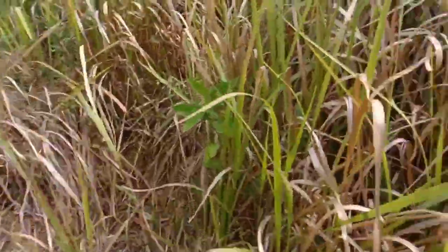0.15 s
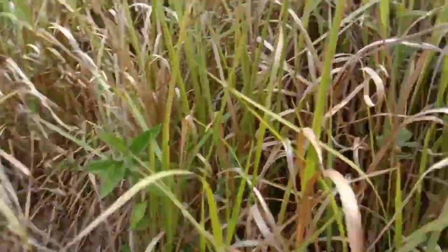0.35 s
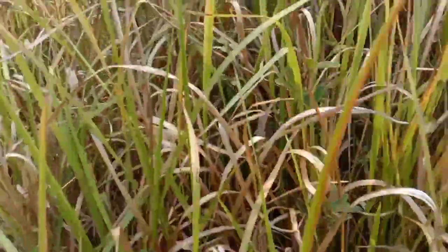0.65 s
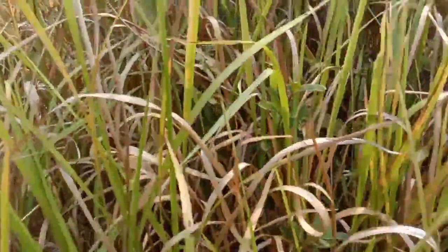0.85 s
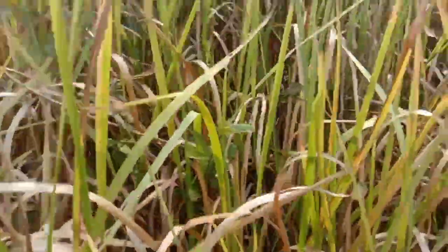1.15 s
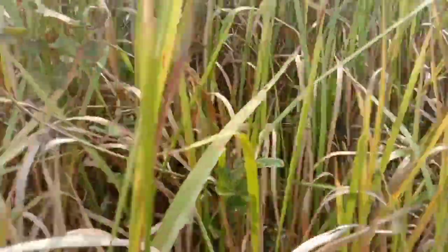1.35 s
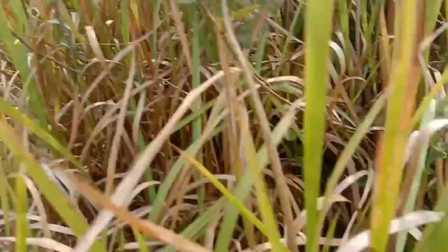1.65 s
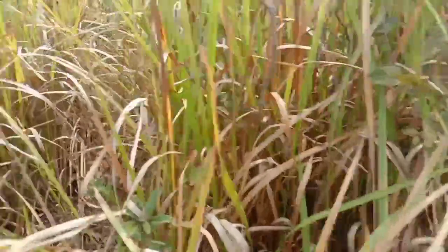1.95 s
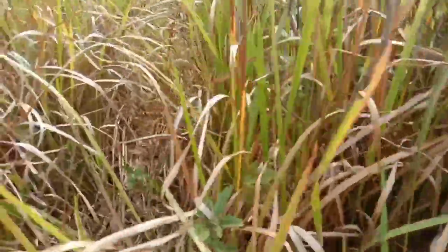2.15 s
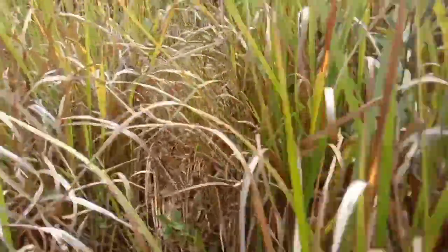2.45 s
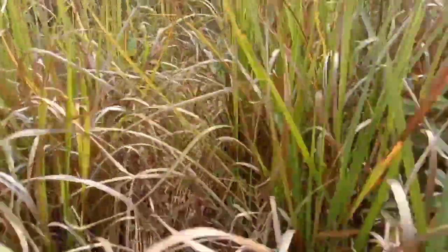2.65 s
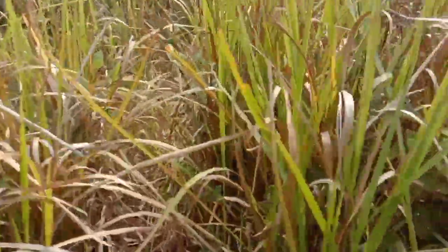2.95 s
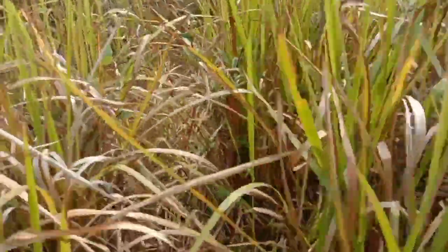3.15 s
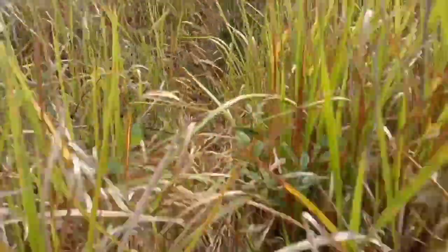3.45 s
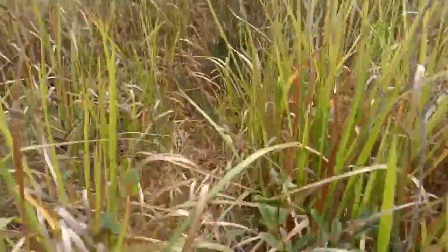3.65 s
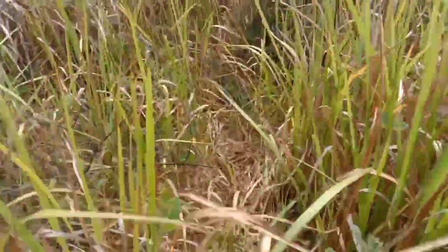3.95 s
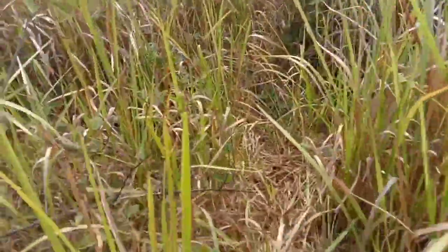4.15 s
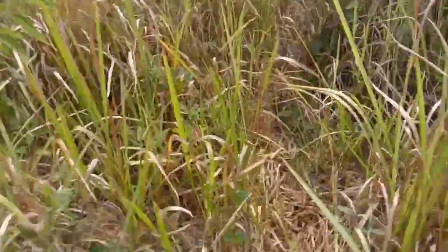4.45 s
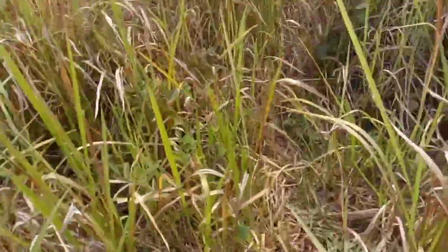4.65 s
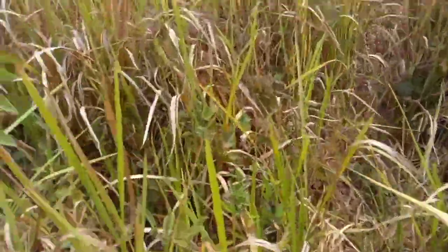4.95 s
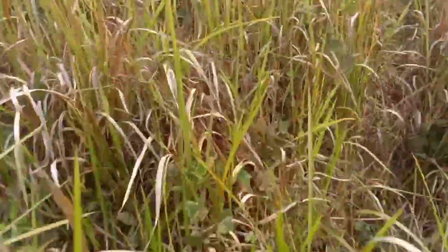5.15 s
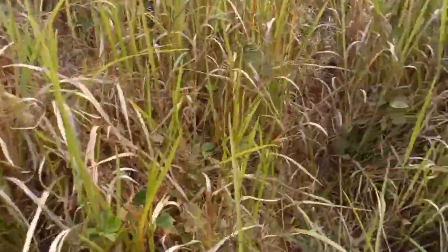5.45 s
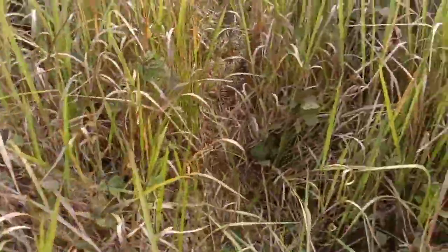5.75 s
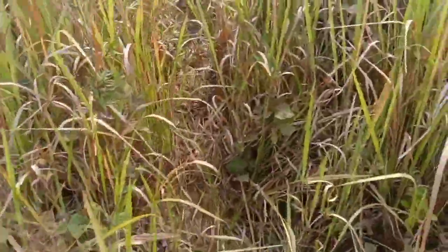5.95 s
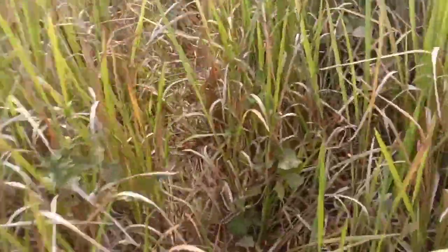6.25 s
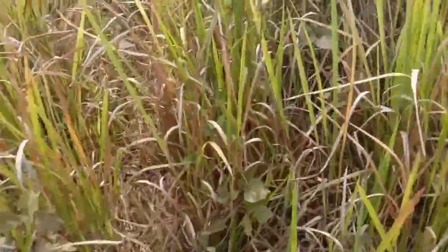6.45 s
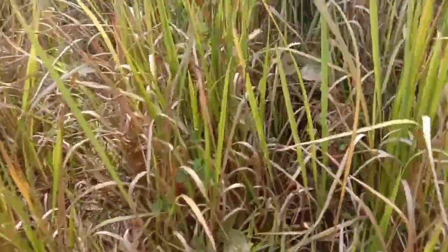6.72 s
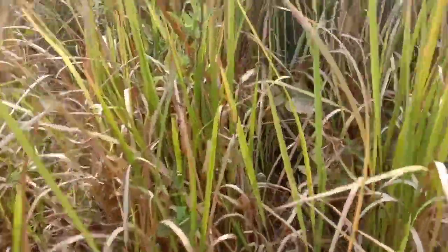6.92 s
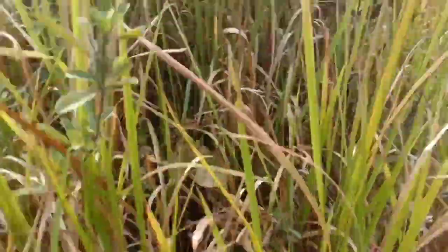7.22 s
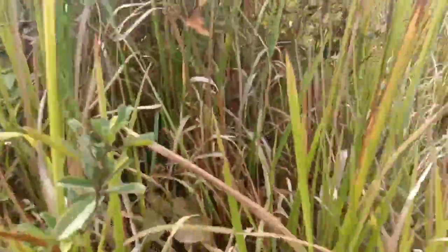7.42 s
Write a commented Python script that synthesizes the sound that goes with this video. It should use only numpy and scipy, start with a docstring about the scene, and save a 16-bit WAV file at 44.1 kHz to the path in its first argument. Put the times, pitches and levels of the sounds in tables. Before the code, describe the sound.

Someone pushes through tall dry grass outdoors, the blades scraping and swishing right against a handheld microphone. The papery rustle comes in uneven surges, with single blades whipping past, stalks snapping and a few hollow knocks and soft handling bumps. It is loudest in the middle, drops to a lull, then returns in a shorter push. Faint low wind buffeting and a thin hiss of distant grass lie underneath.

```python
"""In tall dry grass, someone pushes through, holding a phone in a housing.
Rough blades scrape in thousands of tiny slips: thick stems low, blades in the middle, dry tips and
hairs high. Single blades drag and whip past, stalks snap, stems knock the housing, soft bumps come
through the hand. Air buffets the port and far grass hisses in the lulls.
The housing's cavities colour the rustle and the hits."""
import sys
import numpy as np
from scipy import signal
from scipy.io import wavfile

SR = 44100
rng = np.random.default_rng(int(sys.argv[2]) if len(sys.argv) > 2 else 0)


def digitize_waveform(pressure):
    """Quantize a signal to 16-bit integers and store it at the path in sys.argv[1].

    Rows of a 2-D input are taken as channels; values are limited to [-1, 1].
    """
    field = np.atleast_2d(pressure).T
    bounded = np.clip(field, -1, 1)
    quanta = np.round(bounded * 32767).astype(np.int16)
    wavfile.write(sys.argv[1], SR, quanta)


N = 334278

# Air on the port. Each row: time in seconds, level in dB.
AIR_CURVE = [(0.0, -56), (1.46, -51.5), (1.63, -57.5), (3.93, -52.5), (4.2, -56.5), (4.45, -49),
             (5.59, -60), (6.8, -55.5), (7.58, -62.5)]
# The housing's cavities and nulls. Each row: centre in Hz, width in Hz, boost or cut in dB.
HOUSING_EQ = [(1270, 73, 11.5), (2650, 800, 13.5), (3470, 2900, 8), (4370, 290, -8), (5010, 380, -14.5),
              (5822, 1200, 17), (6280, 280, -2.5), (7434, 910, 12.5), (8640, 3800, -3.5),
              (10100, 7000, 3.5), (12200, 1070, -9), (13400, 790, -4), (15700, 2100, 10)]
# Soft bumps through the hand. Each row: start in seconds, level in dB before trim, pitch in Hz.
HAND_BUMPS = [(1.113, -48, 86.1), (1.283, -36, 167), (1.323, -35, 95.5), (1.374, -33, 140),
              (1.38, -29.5, 85), (1.452, -32, 186), (1.481, -28.5, 139), (2.625, -44, 140),
              (3.168, -45, 135), (3.739, -42, 163), (3.828, -40, 161), (4.189, -45, 102), (4.452, -36, 148),
              (4.87, -40, 146), (5.154, -42, 103), (6.973, -41, 135)]
# Stems knocking the housing. Each row: start in seconds, level in dB before trim, pitch in Hz.
STEM_KNOCKS = [(0.352, -18.5, 1270), (1.293, -46, 1550), (1.45, -34, 323), (2.388, -29, 840),
               (2.408, -16.5, 850), (2.416, -26, 596), (5.53, -49, 1400), (5.607, -39.5, 1300),
               (7.024, -33, 1300)]
# Snapping stalks. Each row: start in seconds, level in dB before trim, pitch in Hz.
STALK_SNAPS = [(1.2942, -9, 3430), (1.5923, -26, 2690), (2.1201, -10.5, 5820), (5.53, -29.5, 2470),
               (5.5638, -41, 2870), (5.607, -26, 2420), (5.648, -36, 2650), (6.4817, -24, 2460),
               (6.7147, -16, 3120), (7.0237, -10, 7700), (7.082, -32, 2700)]
# Hollow stems rubbing the legs. Each row: centre in seconds, level in dB, hold each side in seconds.
LEG_RUBS = [(0.36, -61, .03), (0.46, -49, 0.014), (0.61, -53, 0.041), (2.13, -49.5, 0.087),
            (2.29, -58, 0.02), (2.41, -49, 0.011), (2.88, -52.5, 0.033), (3.44, -47, 0.043),
            (3.68, -54, 0.047), (3.99, -53, 0.026), (4.15, -57, 0.019), (4.31, -58, .03), (4.57, -58, .06),
            (4.77, -51.5, .06), (4.94, -58, 0.036), (5.16, -53, 0.017), (6.17, -60, 0.012),
            (6.76, -55, 0.016)]
# Blades whipping past. Each row: start in seconds, level in dB before trim, seconds to fall 60 dB.
BLADE_WHIPS = [(0.072, -42, 0.065), (0.11, -14, 0.055), (0.387, -11, 0.18), (1.116, -22, 0.049),
               (1.254, -15.5, 0.061), (2.045, -17, 0.074), (2.12, -17.5, 0.05), (2.776, -11, 0.062),
               (3.284, -33, .08), (3.593, -14, 0.067), (3.649, -25, 0.1), (4.303, -0.5, 0.059),
               (4.398, -4.5, 0.052), (4.582, -8, 0.095), (5.068, -12.5, 0.065), (5.77, -36, 0.29),
               (6.107, -20, 0.36), (6.47, -23.5, 0.087), (7.542, -27, 0.07)]
# Blades dragged across and let go. Each row: start in seconds, length in seconds, level in dB,
# then tips and fine hairs, both in dB relative to that level.
BLADE_DRAGS = [(0.453, 0.045, -35, 4, 4), (0.687, .13, -37, 1, 1), (1.097, 0.055, -39, -2, 2.5),
               (1.176, 0.072, -49, -3, 8), (1.235, 0.09, -32.5, -4, -1), (1.308, 0.084, -30.5, -4.5, -6),
               (1.45, 0.089, -35, -2.5, -4), (1.583, 0.059, -38.5, 0, -2), (1.642, 0.059, -40.5, -1, -3),
               (1.763, 0.073, -36.5, -5, -8), (1.946, .03, -43, 1, 4.5), (2.088, 0.063, -40, 6, 9),
               (2.693, 0.04, -33.5, 0, -8.5), (2.766, 0.14, -28, 3, -4.5), (3.683, 0.03, -31, 5, 0),
               (4.244, 0.048, -26, 3.5, 2), (4.851, 0.1, -24, 1, -5), (5.256, 0.044, -44.5, 9, 0),
               (5.425, 0.046, -45, -5, -11), (5.84, 0.05, -47, -7, -12), (6.58, 0.044, -43.5, 0, -12),
               (7.056, 0.05, -42, 1.5, -9), (7.17, 0.11, -53, -2, -8), (7.297, 0.057, -49.5, -4, -6)]
# The push through the grass. Each row: time in seconds, blade level in dB,
# then stems and treble, both in dB relative to the blades.
PUSH_CURVE = [(0.0, -43, -4, 1.5), (0.12, -34.5, -15, 0.5), (0.23, -36, -12, 2), (0.39, -23.5, -9, -3.5),
              (0.43, -28.5, -8, 2), (0.9, -45, -5, 0.5), (1.06, -43.5, -8, -1), (1.29, -35, -11.5, 2),
              (1.43, -37.5, -6, -3), (1.57, -38, -8.5, 1), (1.87, -44, -8.5, -2), (1.99, -41, -6, -1),
              (2.05, -28.5, -7, 1), (2.09, -30, -16.5, 1), (2.2, -36.5, -13, -8), (2.3, -30.5, -17.5, -1),
              (2.42, -30, -11, -2.5), (2.51, -31.5, -14.5, 1), (2.66, -40, -7, 2.5), (2.75, -37, -5, 1),
              (2.9, -19, -14.5, 2), (3.13, -26.5, -10, 2.5), (3.46, -24, -9.5, 0), (3.63, -31, -15, 0),
              (3.93, -33.5, -9.5, 2), (4.01, -27, -8, 2), (4.54, -24, -10.5, 3), (4.62, -17.5, -11.5, 4.5),
              (4.83, -24.5, -10, 3.5), (5.0, -24.5, -10.5, 3), (5.3, -43.5, -5.5, 1), (5.51, -52, -3, -1.5),
              (6.02, -52.5, -8.5, -3), (6.12, -33, -6, -4), (6.18, -31, -3.5, -7.5),
              (6.24, -35.5, -5.5, -2), (6.52, -44.5, -4, 0), (6.63, -46.5, -3, 5), (6.71, -32, -4.5, 1),
              (6.82, -29.5, -14.5, 0), (6.95, -34.5, -8.5, 0.5), (6.99, -43, -8, -1),
              (7.12, -48.5, -7.5, -3), (7.45, -56, -2.5, -0.5), (7.58, -32, -7.5, 2)]


def from_db(db):
    """dB to gain."""
    return 10 ** (np.asarray(db) / 20)


def unit_rms(x):
    """Scale to an rms of 1."""
    return x / np.sqrt(np.mean(x ** 2) + 1e-20)


def automation(rows):
    """One lane per level column of a curve, with a value for every sample."""
    times, *columns = np.transpose(rows)
    return [np.interp(np.arange(N) / SR, times, column) for column in columns]


def drift(corner_hz):
    """A slow random wobble of rms 1: noise at every 20th sample, low-passed twice."""
    pole = np.exp(-2 * np.pi * corner_hz * 20 / SR)
    slow = signal.lfilter([1], [1, -2 * pole, pole * pole], rng.standard_normal(N // 20 + 3002))[3000:]
    return np.interp(np.arange(N) / 20, np.arange(len(slow)), unit_rms(slow))


def band(x, low_hz, high_hz, order=2):
    """Butterworth band-pass."""
    return signal.sosfilt(signal.butter(order, [low_hz, high_hz], "band", fs=SR, output="sos"), x)


def housing(x):
    """The housing's colour: a chain of peaks and dips, one per cavity or null."""
    for hz, width_hz, level_db in HOUSING_EQ:
        tuning = -2 * np.cos(2 * np.pi * hz / SR)
        gain, width = from_db(level_db / 2), np.tan(np.pi * width_hz / SR)
        zeros = [1 + width * gain, tuning, 1 - width * gain]
        poles = [1 + width / gain, tuning, 1 - width / gain]
        x = signal.lfilter(zeros, poles, x)
    return x


def far_grass(level_db=-75):
    """Far grass in the breeze: a smooth bed of hiss that shows in the lulls."""
    return from_db(level_db) * unit_rms(housing(band(rng.standard_normal(N), 200, 6700, order=1)))


def air_buffet():
    """Lumpy low turbulence at the port; its deep and upper halves gust separately."""
    deep = unit_rms(band(rng.standard_normal(N), 59, 114)) * from_db(1.3 * drift(7.1))
    upper = unit_rms(band(rng.standard_normal(N), 93, 200)) * from_db(3.0 * drift(3.1) + 3.5)
    sub = 0.14 * unit_rms(band(rng.standard_normal(N), 15, 50))
    return from_db(automation(AIR_CURVE)[0]) * unit_rms(deep + upper + sub)


def hits(events, decay_cycles, trim_db):
    """A bump, knock or snap: a damped ring with a soft first half cycle, heard through the housing."""
    out, t = np.zeros(N + 4096), np.arange(4096) / SR
    for start, level_db, hz in events:
        i = round(start * SR)
        envelope = (1 - np.exp(-t * hz / 0.4)) * np.exp(-t * hz / decay_cycles)
        out[i:i + 4096] -= from_db(level_db + trim_db) * envelope * np.sin(2 * np.pi * hz * t)
    return housing(out[:N] + 1e-18)


def slips(per_s, spread_db, clump_db):
    """Stick-slip grain: random ticks of uneven size, coming in clumps, over a smooth hiss."""
    sizes = from_db(spread_db * np.minimum(rng.exponential(1, N), 5)) * rng.choice([-1, 1], N)
    triggers = rng.random(N) < per_s / SR
    clumps = from_db(clump_db * (drift(36) + 0.68 * drift(27)))
    return unit_rms(sizes * triggers * clumps) + from_db(-1) * rng.standard_normal(N)


def hollow_stems(bed_db=-61.5, push_follow=0.31, rise_db_per_s=257, fall_db_per_s=255):
    """Rubbing sounds the hollow of thick stalks: a bed riding the push, and rubs that swell and fade."""
    rub = band(slips(1500, spread_db=1.5, clump_db=3.0), 302, 405)
    blades_db, t = automation(PUSH_CURVE)[0], np.arange(N) / SR
    gain = from_db(bed_db + push_follow * (blades_db - blades_db.mean()))
    for centre, level_db, hold in LEG_RUBS:
        fade_db = np.minimum(rise_db_per_s * (t - centre + hold), fall_db_per_s * (centre + hold - t))
        gain += from_db(level_db + np.minimum(0, fade_db))
    return gain * unit_rms(rub)


def whipping_blades(attack_s=0.0041, trim_db=-7.5):
    """Each whip is a burst of slips with a fast attack and a dying tail."""
    envelope, t = np.zeros(N + 8192), np.arange(8192) / SR
    for start, level_db, t60 in BLADE_WHIPS:
        i = round(start * SR)
        envelope[i:i + 8192] += from_db(level_db + trim_db - 60 * t / t60) * np.minimum(t / attack_s, 1)
    return envelope[:N] * unit_rms(housing(slips(9000, spread_db=2.0, clump_db=1.5)))


def drag_powers(fade_s=0.009):
    """Power envelopes for the body, tips and hairs of dragged blades: quick in, hold, quick out."""
    t, powers = np.arange(N) / SR, 0
    for start, length, level_db, tips_db, hairs_db in BLADE_DRAGS:
        gain = from_db(level_db) * np.clip(np.minimum(t - start, start + length - t) / fade_s, 0, 1)
        powers += (gain * from_db([[0], [tips_db], [hairs_db]])) ** 2
    return powers


def papery_flicks(per_s, decay_cycles):
    """Dry blades flick and ring briefly, each at its own pitch; ringing twice softens the attack."""
    sizes = from_db(3.3 * np.minimum(rng.exponential(1, N), 4)) * (rng.random(N) < per_s / SR)
    pitch_index, out = rng.integers(0, 48, N), 0
    for k, hz in enumerate(np.geomspace(450, 15000, 48)):
        radius = np.exp(-hz / decay_cycles / SR)
        poles = [1, -2 * radius * np.cos(2 * np.pi * hz / SR), radius * radius]
        flicks = sizes * (pitch_index == k) + 1e-18
        ring = signal.lfilter([1], poles, signal.lfilter([1], poles, flicks))
        out += np.sqrt(hz) * unit_rms(ring)  # equal power per Hz
    return unit_rms(out)


def flutter(x, low_hz, high_hz, depth_db):
    """One band of the grass, split into five narrow strips whose levels each flutter alone."""
    edges, out = np.geomspace(low_hz, high_hz, 6), 0
    for k in range(5):
        wobble = from_db(depth_db * (drift(20) + 1.07 * drift(8.7)))
        out += (-1) ** k * band(x, edges[k], edges[k + 1]) * wobble
    return unit_rms(out)


def rustle(surge_db=0.32, drag_stems_db=-10.5):
    """The main scrape: one stream of slips and flicks feeds every band, riding the push and the drags."""
    blades_db, stems_db, treble_db = automation(PUSH_CURVE)
    body_drag, tips_drag, hairs_drag = drag_powers()
    surge = from_db(surge_db * drift(15.3))  # the push surges at random
    flicks = from_db(-7) * papery_flicks(1500, decay_cycles=9)
    stream = housing(slips(9000, spread_db=2.5, clump_db=1.0) + flicks)
    # Loud, close blades fill the housing's null; far ones leave it dark.
    null_db = np.maximum(-15.5 + 0.24 * (blades_db + 36), -17)
    tips_db = treble_db - 1.5
    hairs_db = 0.65 * treble_db - 4.5
    sheen_db = -5.5 + 0.088 * (blades_db - blades_db.mean())  # the top opens up with the push
    # Each row: low and high edge in Hz, dB relative to the blades, drag power, flutter depth in dB.
    bands = [(440, 2042, stems_db, body_drag * from_db(2 * drag_stems_db), 2.36),
             (1891, 4530, 0, body_drag, 1.55),
             (4205, 5283, null_db, body_drag * from_db(2 * null_db), 1.1),
             (5105, 8666, tips_db, tips_drag, 1.5),
             (8440, 13600, hairs_db, hairs_drag, 1.67),
             (14000, 15900, hairs_db + sheen_db, hairs_drag * from_db(2 * sheen_db), 2.0)]
    out = 0
    for low_hz, high_hz, offset_db, drag_power, flutter_db in bands:
        push_power = from_db(2 * (blades_db + offset_db))
        out += np.sqrt(push_power + drag_power) * flutter(stream, low_hz, high_hz, flutter_db)
    return surge * out


def scene():
    """The mono mix: everything reaches one port."""
    snaps = hits(STALK_SNAPS, decay_cycles=1.4, trim_db=-8.0)
    knocks = hits(STEM_KNOCKS, decay_cycles=0.75, trim_db=9.5)
    bumps = hits(HAND_BUMPS, decay_cycles=1.5, trim_db=7.5)
    near_grass = rustle() + whipping_blades() + hollow_stems()
    return (near_grass + snaps + knocks + bumps + air_buffet() + far_grass())[None]


def record(dry):
    """Roll off the deep bass, round the highest peaks, cut the top steeply."""
    low_cut_hz, ceiling, high_cut_hz = 44, 0.95, 15480
    trimmed = signal.sosfilt(signal.butter(2, low_cut_hz, "high", fs=SR, output="sos"), dry)
    rounded = trimmed / (1 + np.abs(trimmed / ceiling) ** 4) ** 0.25
    return signal.sosfilt(signal.ellip(16, 0.5, 95, high_cut_hz, fs=SR, output="sos"), rounded)


dry = scene()
out = record(dry)
digitize_waveform(out)
```